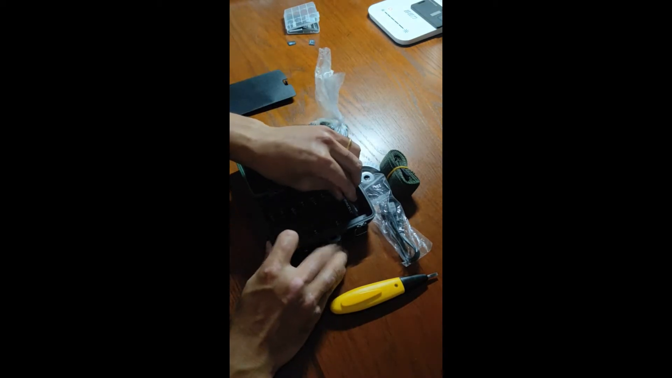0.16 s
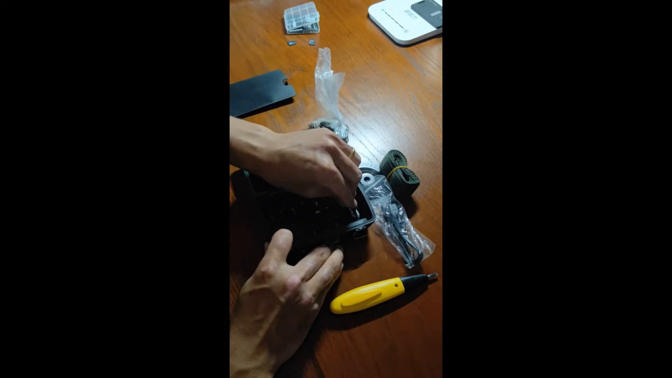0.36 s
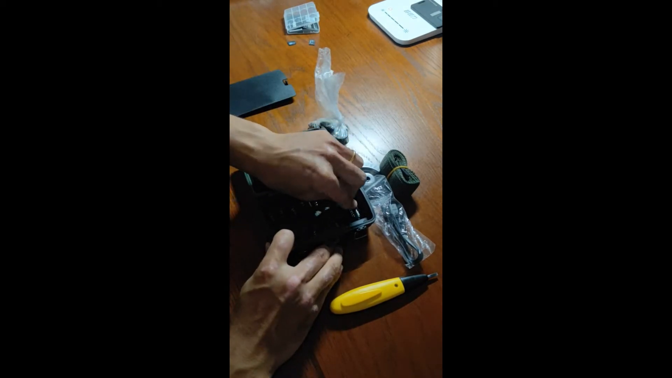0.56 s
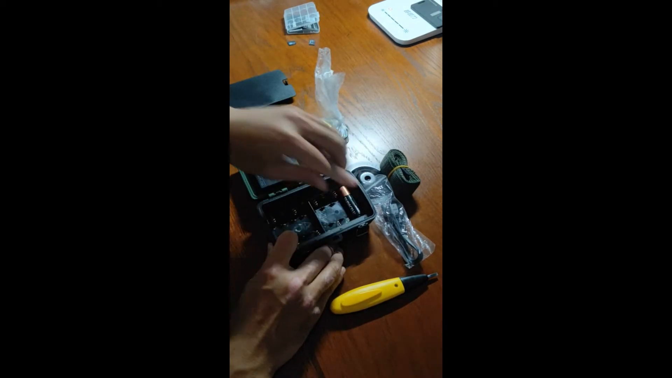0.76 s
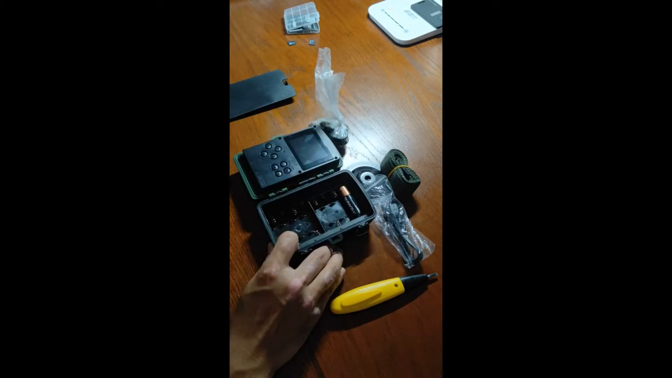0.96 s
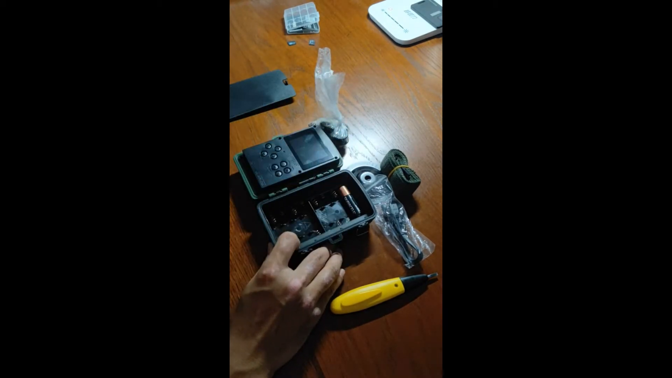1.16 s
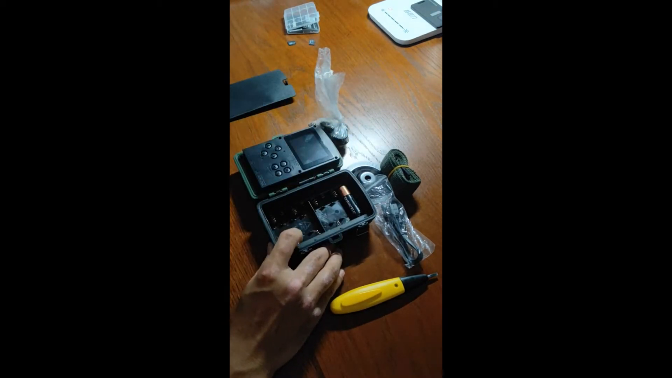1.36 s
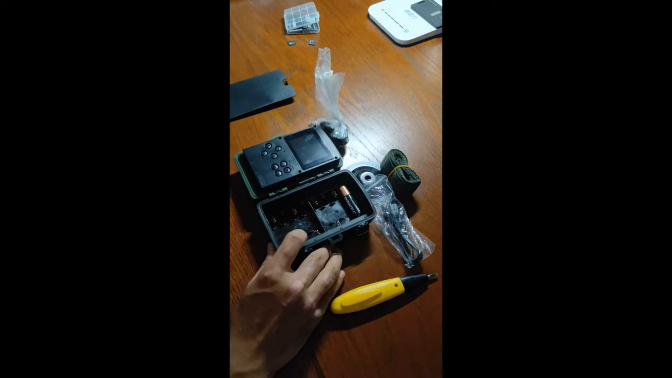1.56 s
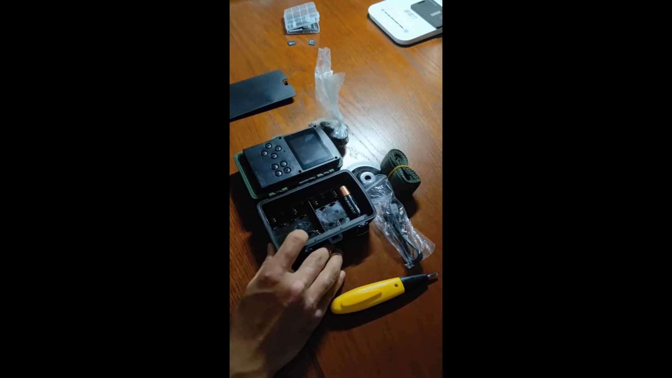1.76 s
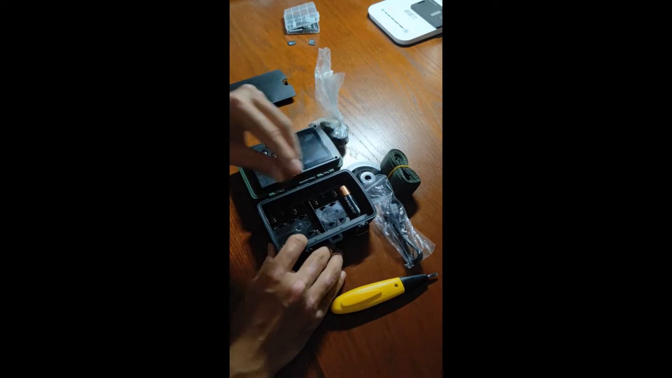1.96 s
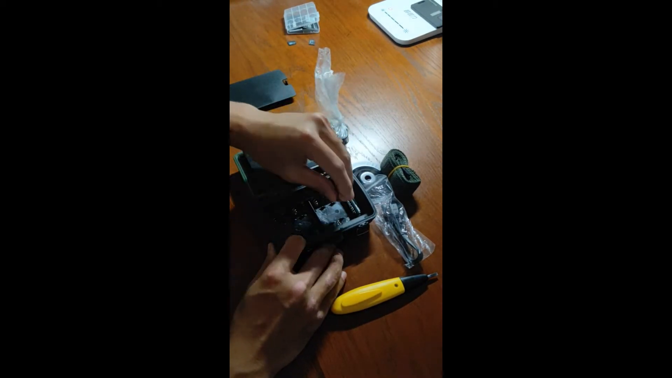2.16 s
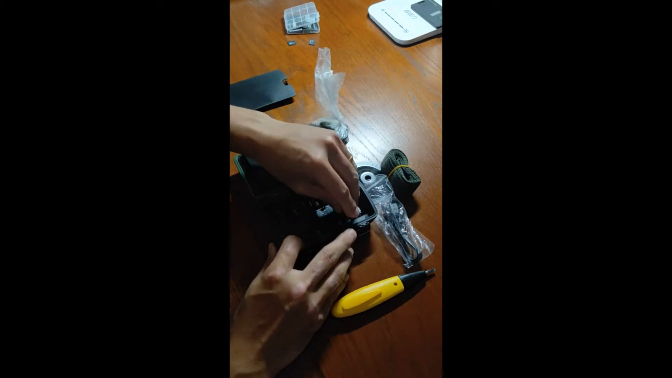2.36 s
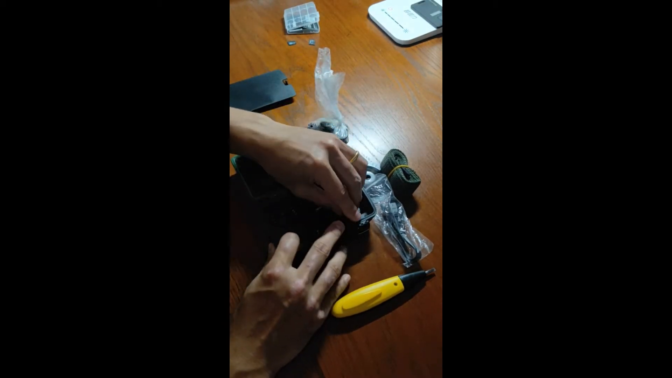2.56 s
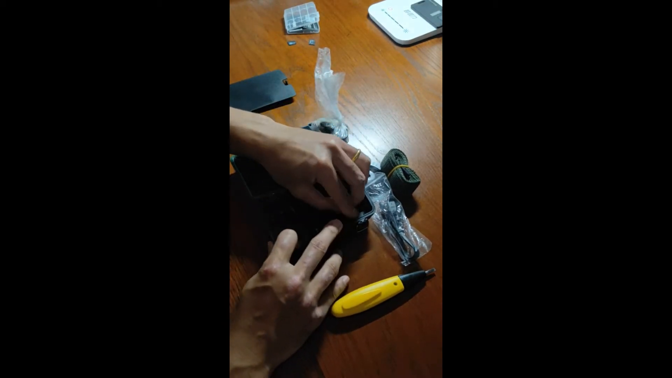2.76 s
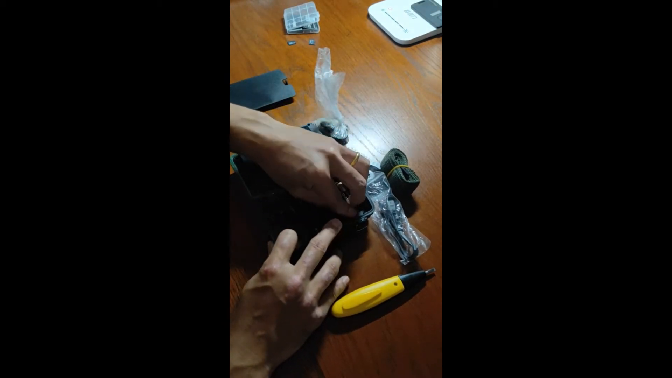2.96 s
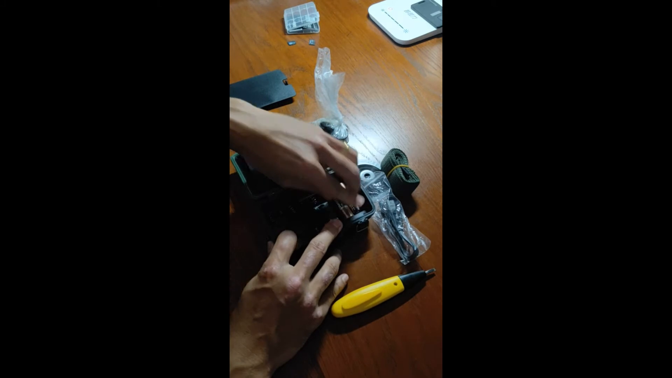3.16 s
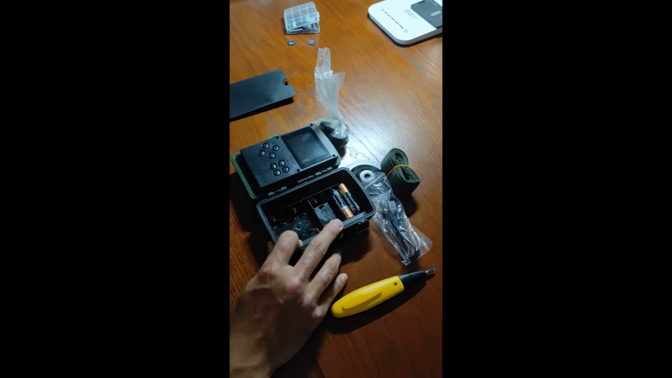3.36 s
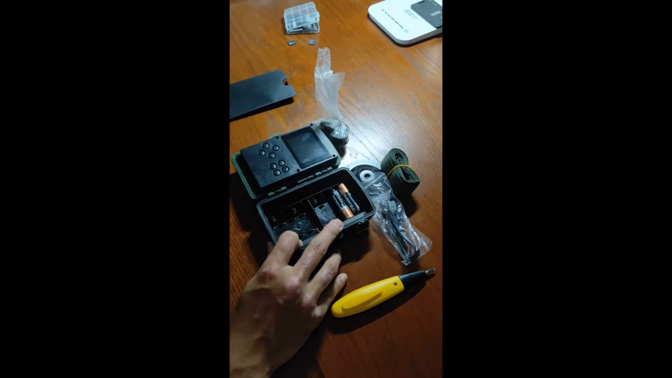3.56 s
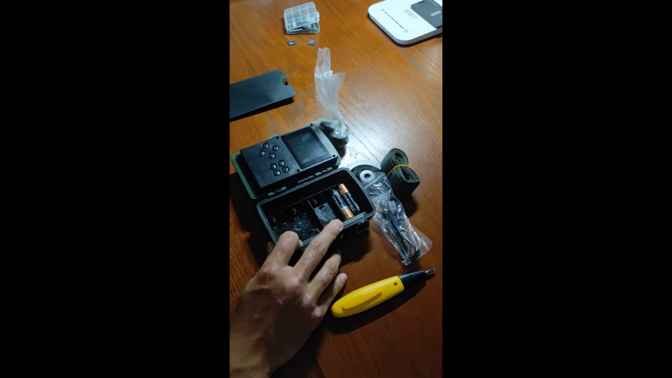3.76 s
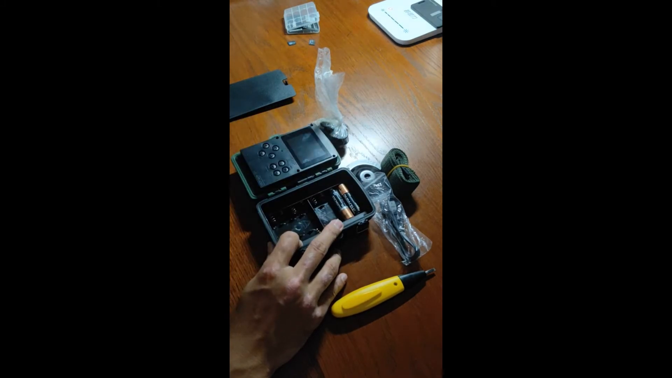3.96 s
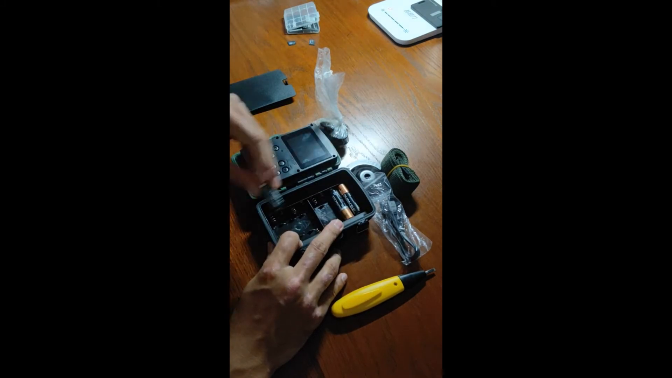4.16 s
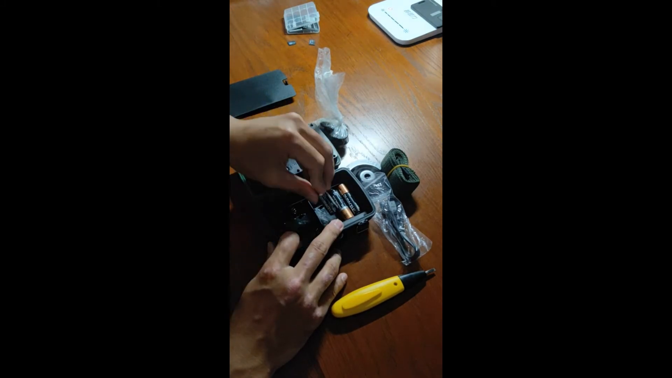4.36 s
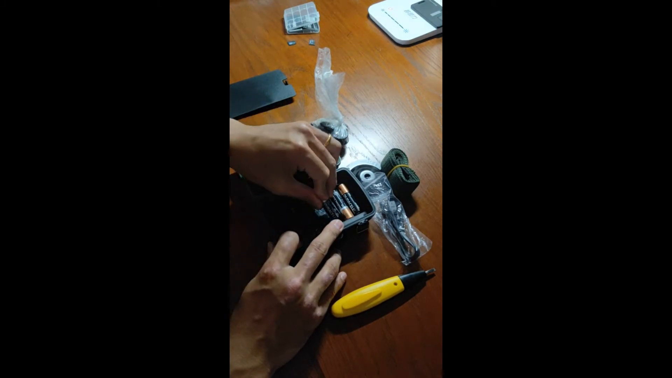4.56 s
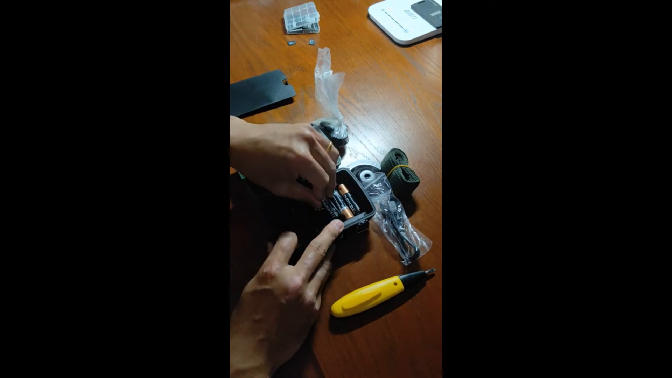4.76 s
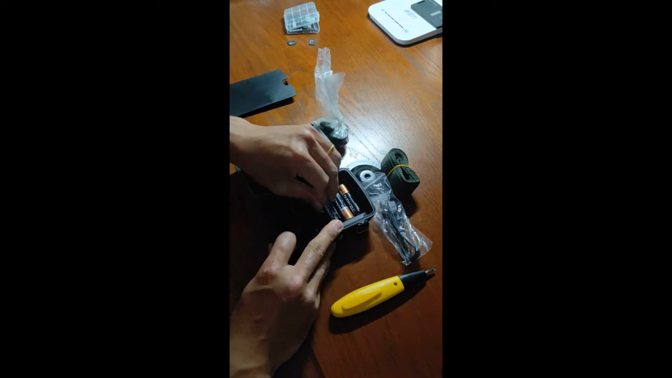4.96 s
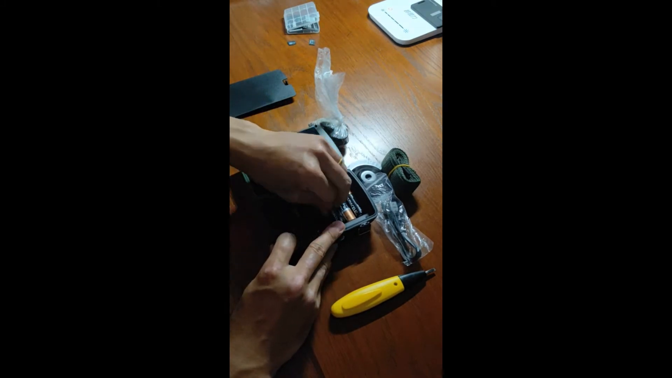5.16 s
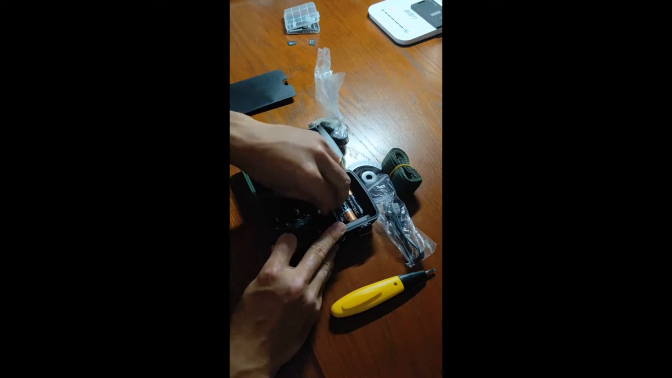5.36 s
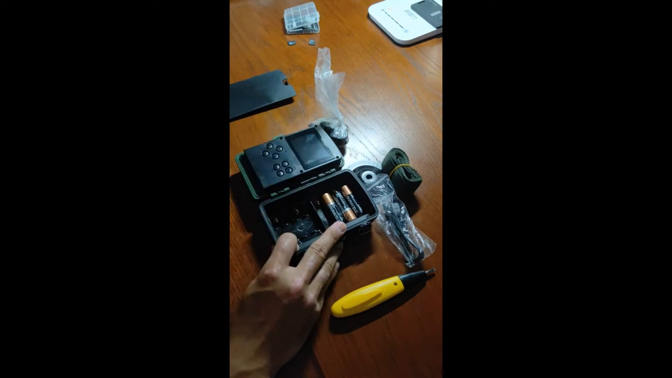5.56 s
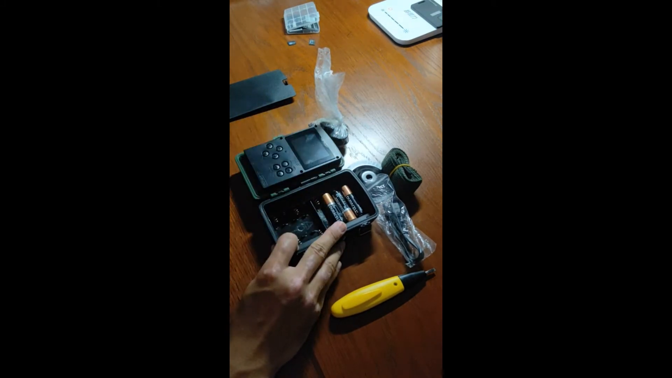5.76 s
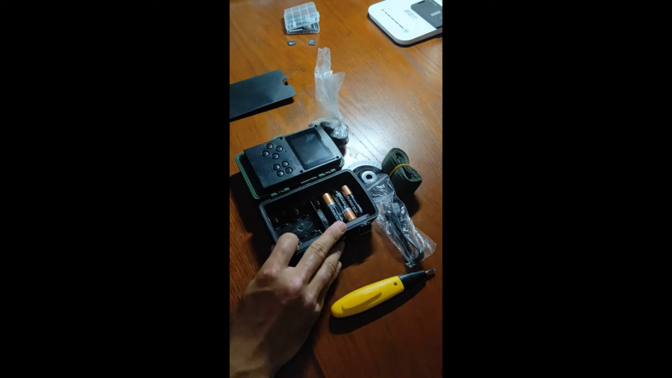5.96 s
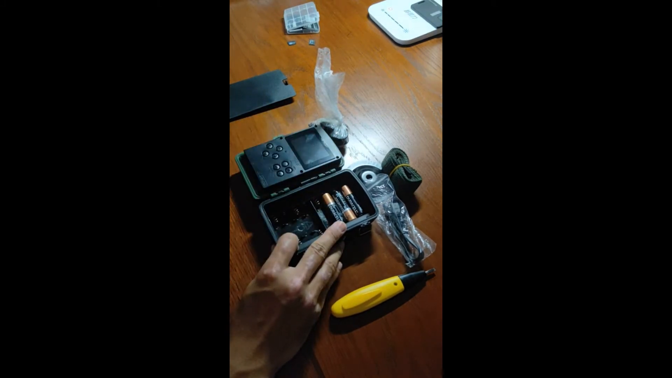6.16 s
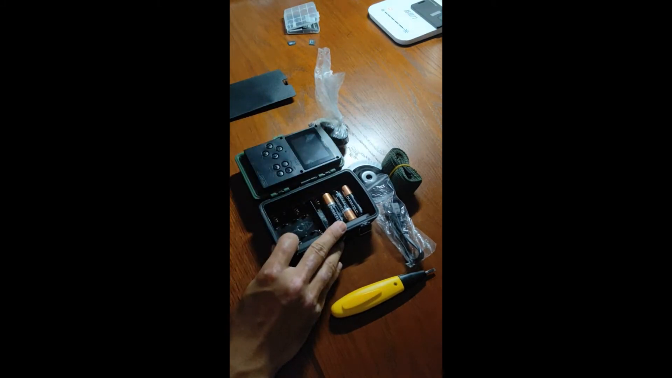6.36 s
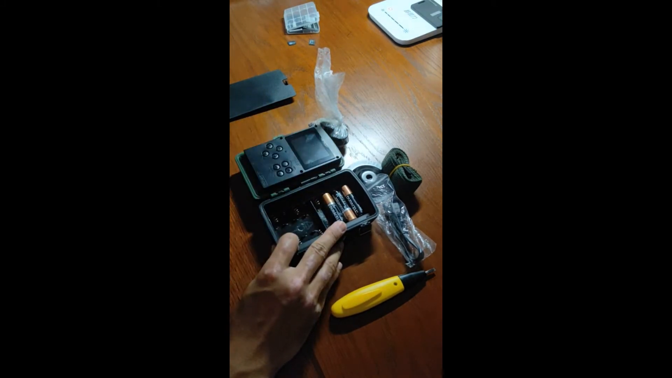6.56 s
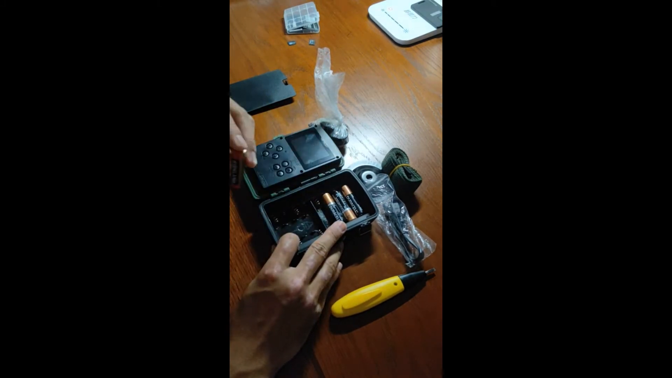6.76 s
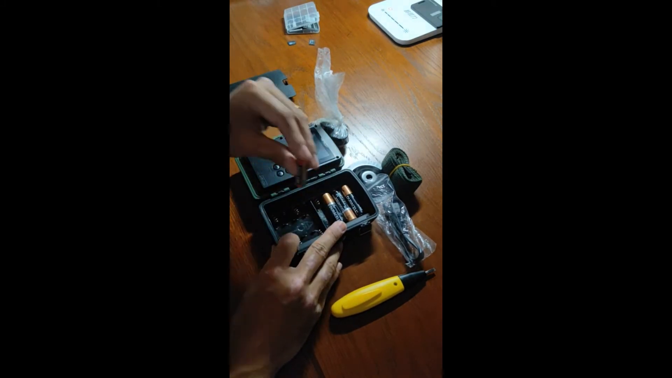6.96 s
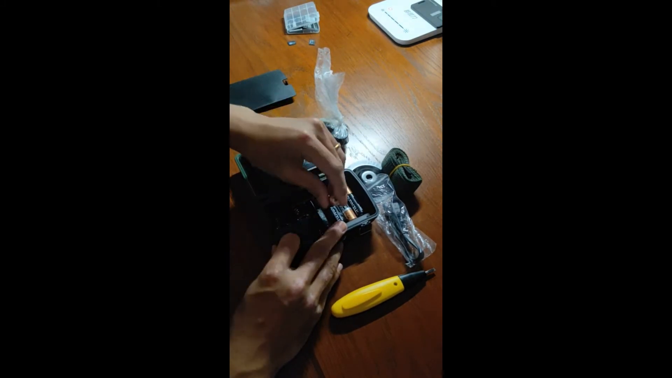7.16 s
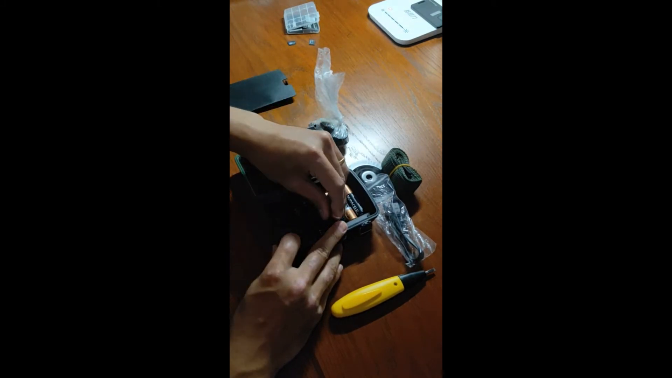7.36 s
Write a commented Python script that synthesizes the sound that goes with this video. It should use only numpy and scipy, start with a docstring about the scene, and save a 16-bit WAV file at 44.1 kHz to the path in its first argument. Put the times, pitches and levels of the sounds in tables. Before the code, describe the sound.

Sharp, irregular plastic clicks and knocks as batteries are pressed into a case, with light scrapes, rubbing fingers and soft room noise.

```python
"""Batteries click one by one into the plastic bay of a camera that lies open on a wooden table.
Each knock makes the table, the hollow case and its thin walls ring; hard presses jolt the table top.
Contact springs ping, batteries scrape along the plastic, and fingers bump and rub the case.
A small room echoes all of this, over soft air noise and a faint mains hum."""
import sys
import numpy as np
from scipy import signal
from scipy.io import wavfile

SR = 44100
rng = np.random.default_rng(int(sys.argv[2]) if len(sys.argv) > 2 else 0)


def unload_wav(signal):
    """Save mono or channel-first audio to the path in sys.argv[1] as 16-bit WAV at rate SR, clipped to [-1, 1]."""
    wavfile.write(
        sys.argv[1],
        SR,
        np.round(np.clip(np.atleast_2d(signal).T, -1, 1) * 32767).astype(np.int16),
    )


N = 326781

# Tone color of the room air: (frequency [Hz], relative level [dB])
AIR_SPECTRUM = [(20, -3), (35, 1.5), (65, -4), (100, -13.5), (170, -16.5), (300, -16), (450, -23),
                (650, -25.5), (900, -24.5), (1400, -33), (3000, -35.5), (8000, -37.5)]
# Tones of the hum: (frequency [Hz], average level [dB])
HUM_TONES = [(59.5, -78), (120, -70), (240, -85), (441, -81)]
# How alike left and right are for sound from all sides: (frequency [Hz], likeness [-1 to 1])
STEREO_LIKENESS = [(25, .55), (100, 1), (330, -0.008), (600, 1), (1000, -0.32), (1600, -0.28),
                   (3000, -0.14)]
# The room's echo: (frequency [Hz], relative level [dB], fade time [s])
# A fade time is how long a sound takes to drop by 60 dB.
ROOM_ECHO = [(100, 5, 0.3), (254, -4.5, 0.51), (447, -6, .5), (782, -1, .48), (1720, -1, 0.53),
             (3460, -1, 0.41), (5982, -3.5, 0.51), (8000, 2, 0.12)]
# Fingers rub the case: (start [s], length [s], relative level [dB])
FINGER_RUBS = [(0.106, 0.56, -65.5), (1.568, 0.086, -64), (2.19, 0.16, -61), (2.4, 0.43, -64),
               (3.605, 0.15, -56.5), (4.542, 0.41, -65.5), (4.997, .4, -69.5), (5.876, 0.16, -71),
               (7.298, 0.12, -63)]
# A battery slides: (middle time [s], half length [s], level [dB])
BATTERY_SLIDES = [(0.116, 0.012, -74), (0.177, 0.0087, -70), (0.63, 0.052, -80.5), (2.209, 0.03, -68),
                  (2.337, 0.012, -77), (2.726, 0.012, -59.5), (4.518, 0.016, -68), (4.635, 0.013, -61),
                  (4.932, 0.009, -67), (5.048, 0.048, -71.5)]
# Hard presses shake the table: (time [s], frequency [Hz], relative level [dB], fade time [s])
TABLE_JOLTS = [(.183, 74.6, -46.5, 0.14), (2.937, 71.6, -44, 0.096), (5.075, 80.3, -54, 0.14)]
# Contact springs let go: (time [s], frequency [Hz], relative level [dB], fade time [s])
SPRING_PINGS = [(2.727, 5800, -43.5, 0.019), (2.727, 6530, -42.5, 0.021), (2.9385, 4580, -29, 0.0066),
                (3.617, 4640, -56, .1), (3.617, 6700, -44, 0.03)]
# Natural tones of the case on the table: (frequency [Hz], relative level [dB], fade time [s])
CASE_TONES = [(127.6, 4, 0.19), (222.2, -2, 0.25), (235, -3.5, 0.13), (314.9, -3.5, 0.2),
              (350.7, -4, 0.082), (426.2, 1.5, 0.072), (505, -7.5, .06), (586, 1, 0.088), (715.8, 1, 0.034),
              (832.6, -1, 0.035), (957, -7.5, 0.046), (1238, -5, 0.029), (1395, -6, 0.025), (1522, -3, .04),
              (1740, -9, 0.024), (2000, -2, .04), (2427, -3.5, 0.089), (3490, 1, .025), (5000, -6.5, 0.015),
              (5300, -4.5, 0.015), (6040, 0, 0.028), (6700, -2, 0.0079), (7260, 8.5, .016)]
# Six pitch ranges of a knock, bass to treble: (low edge [Hz], high edge [Hz], gain [dB],
# noise level against the tones [dB], noise fade time [s], left-right likeness [-1 to 1])
PITCH_RANGES = [(83, 280, -1.5, -5.5, 0.15, 1), (280, 520, -2.5, -8.5, 0.19, 1),
                (520, 1050, -0.5, -6, .07, 0.23), (1140, 1900, -4, -3.5, 0.019, 0.4),
                (1770, 3400, -0.5, 9, 0.05, 0.086), (4280, 7600, 0, 5.5, 0.028, -0.26)]
# How each range answers a knock: (gain [dB], share of hardness [0 to 1], share of weight [0 to 1],
# most boost from a nearby favored pitch [dB])
KNOCK_RESPONSE = [(-2.5, 0, 1, 7), (1.5, 0.063, 0.55, 5.5), (-2.5, 0.091, 0, 7.5), (-9.5, .33, 0, 12),
                  (-9.5, 0.96, 0.047, 10), (-2.5, 1, 0, 4)]
# A fingertip bumps the case: (time [s], relative level [dB], weight [dB], favored pitch [Hz])
FINGER_BUMPS = [(0.149, -72, 17, 310), (.216, -54.5, 7, 304), (0.564, -73.5, 17.5, 384),
                (2.207, -62, 4, 434), (2.273, -54, -1.5, 305), (2.406, -67, 4, 310), (2.604, -58, 1, 316),
                (3.153, -53, 2.5, 801), (3.176, -58.5, -2, 314), (3.676, -61, 13, 445),
                (5.325, -60, -7, 425), (5.363, -65, 7, 420), (5.691, -53, 12, 321),
                (5.705, -64, 11.5, 326.3), (5.735, -54.5, -4.5, 748)]
# A battery hits the bay: (time [s], relative level [dB], hardness [dB], weight [dB], favored pitch [Hz])
BATTERY_CLICKS = [(0.099, -66.5, -12, 1.5, 298), (.12, -58, -9, 2.5, 294), (.179, -49.5, -9, 3.5, 352),
                  (0.1872, -32.5, -16.5, -9, 1015), (.249, -61, 1.5, 6.5, 336),
                  (0.4218, -39.5, -7, -8.5, 420), (.632, -66.5, -6, -7, 300), (2.326, -62.5, -10.5, 0, 307),
                  (2.468, -62, -14.5, -2, 322), (2.516, -64, -12.5, -9, 430), (2.577, -45, -7, -4, 322),
                  (2.582, -53.5, -0.5, -5, 418.7), (2.7257, -50.5, -8.5, 7, 435), (2.935, -51, 6, 11, 674),
                  (2.9378, -31, 5, -4, 1278), (2.9402, -28.5, -3.5, -11, 798), (3.609, -67, 6, 0, 492),
                  (3.617, -54.5, 3, -3, 543), (3.633, -54, -3, -16, 610), (3.655, -56, -8.5, -5.5, 587),
                  (3.8338, -49.5, -15.5, -7, 580), (4.472, -68, -6.5, 3, 323), (4.513, -58, -3, 4.5, 325),
                  (4.632, -55, -6, 5.5, 3500), (4.8153, -40.5, -9.5, -9, 1880), (4.859, -52, -22, 1, 427),
                  (4.933, -51.5, -13.5, -5, 383), (5.019, -63.5, -10, 1, 600),
                  (5.0532, -47, -7.5, -9.5, 1475), (5.074, -50.5, 7.5, -9, 1453),
                  (5.078, -45.5, -5, -3.5, 445), (6.174, -54.5, 1.5, -6.5, 598),
                  (6.197, -60.5, 0.5, 1.5, 593), (7.153, -45.5, -2, -5, 3580), (7.3042, -44, -11, -2, 1760)]


def from_db(db):
    """Turns decibels into a gain to multiply by."""
    return 10 ** (np.asarray(db) / 20)


def unit_level(x):
    """Scales a sound to an average (rms) level of 1."""
    return x / np.sqrt(np.mean(x ** 2) + 1e-20)


def unit_attack(x):
    """Scales a sound so its first 10 ms have an average (rms) level of 1."""
    return x / np.sqrt(np.mean(x[:, :SR // 100] ** 2) + 1e-20)


def at_hz(table, hz, column=1):
    """Reads a table at any frequency, blending between its rows."""
    table = np.array(table)
    return np.interp(np.log(hz), np.log(table[:, 0]), table[:, column])


def band(x, low, high, order=2):
    """Keeps the sound between two frequencies."""
    return signal.sosfilt(signal.butter(order, [low, high], "band", fs=SR, output="sos"), x)


def stereo_noise(size, alike):
    """White noise whose two sides are the same (alike=1), unrelated (0) or opposite (-1)."""
    mid, side = rng.standard_normal((2, size))
    alike = np.clip(alike, -1, 1)
    return (np.sqrt(1 + alike) * mid + np.sqrt(1 - alike) * side * [[1], [-1]]) / np.sqrt(2)


def surrounding_bands(size):
    """Noise from all sides, half an octave at a time, each band with its center frequency."""
    edges = 20 * 2 ** (np.arange(19) / 2)
    for low, high in zip(edges, edges[1:]):
        hz = np.sqrt(low * high)
        yield hz, band(stereo_noise(size, at_hz(STEREO_LIKENESS, hz)), low, high)


def drift(turns_per_s):
    """A value that wanders at random around zero."""
    points = rng.standard_normal(N // 100)
    return np.interp(np.arange(N) / SR * turns_per_s, np.arange(len(points)), points)


def add(out, time, sound):
    """Mixes a stereo sound in at a time in seconds."""
    start = int(round(time * SR))
    out[:, start:start + sound.shape[1]] += sound[:, :N - start]


def noisy_rings(events, half_width_hz, alike):
    """Narrow bands of fading noise act as many close tones; a shorter ring has a wider band."""
    out, t = np.zeros((2, N)), np.arange(SR // 4) / SR
    for time, hz, db, fade_s in events:
        reach_hz = half_width_hz + 4.7 / fade_s
        burst = stereo_noise(len(t), alike) * from_db(-60 * t / fade_s)
        ring = band(burst, max(hz - reach_hz, 10), hz + reach_hz)
        add(out, time, from_db(db) * 2 * ring / np.abs(ring).max())
    return out


def room_air(level_db=-66.5):
    """The air in the room makes a soft, low, steady rush."""
    air = sum(noise * from_db(at_hz(AIR_SPECTRUM, hz)) for hz, noise in surrounding_bands(N))
    return from_db(level_db) * unit_level(air)


def mains_hum(waver_db=2.5, waver_rad=0.95):
    """Mains power hums in a few low tones that waver slightly."""
    hum, t = np.zeros(N), np.arange(N) / SR
    for hz, db in HUM_TONES:
        peak = np.sqrt(2) * from_db(db + waver_db * drift(4))
        hum += peak * np.sin(2 * np.pi * hz * t + waver_rad * drift(6.8))
    return hum


def room_echo(sound, first_echo_s=0.0032, early_db=7.0, early_s=0.027):
    """Near surfaces answer first, then comes a smooth tail that dies soonest in the high treble."""
    t = np.arange(int(0.7 * SR)) / SR
    tail = sum(noise * from_db(at_hz(ROOM_ECHO, hz) - 60 * t / at_hz(ROOM_ECHO, hz, column=2))
               for hz, noise in surrounding_bands(len(t)))
    build_up = np.clip(t / first_echo_s - 1, 0, 1) * from_db(early_db * np.exp(-t / early_s))
    echo = tail * build_up / np.sqrt(SR / 20)
    return signal.fftconvolve(sound, echo, axes=1)[:, :N]


def rub_pressure(rise_s=0.05, fall_s=0.037, resting_db=-83):
    """Each rub swells, holds and lets go; in between, the hand rests on the case."""
    pressure, t = np.full(N, from_db(resting_db)), np.arange(N) / SR
    for start, length, db in FINGER_RUBS:
        end = start + length
        pressure += from_db(db) * np.interp(t, [start - rise_s, start, end, end + fall_s], [0, 1, 1, 0])
    return pressure


def finger_rubs(slips_per_s=80, uneven_db=4.5, gain_db=-2.5):
    """Skin sticks and slips, and each tiny slip rings the low tones of the case."""
    slips = (rng.random(N) < slips_per_s / SR) * rng.standard_normal(N)
    slips *= from_db(uneven_db * drift(30))
    body = sum(case_ring(pitch_range) for pitch_range in PITCH_RANGES[:3])
    ringing = signal.fftconvolve(slips[None], body)[:, :N]
    return from_db(gain_db) * rub_pressure() * unit_level(band(ringing, 240, 780))


def battery_slides(catches_per_s=2500):
    """A sliding battery catches on the fine grain of the plastic."""
    t = np.arange(N) / SR
    swells = sum(from_db(db) * np.exp(-((t - middle) / half_length) ** 2)
                 for middle, half_length, db in BATTERY_SLIDES)
    catches = (rng.random(N) < catches_per_s / SR) * rng.standard_normal((2, N))
    return swells * unit_level(band(catches, 1100, 8000, order=1))


def table_jolts():
    """A hard press shakes the table top, which gives a deep thud."""
    return noisy_rings(TABLE_JOLTS, half_width_hz=20, alike=0.93)


def spring_pings():
    """A contact spring lets go and rings, high and short."""
    return noisy_rings(SPRING_PINGS, half_width_hz=130, alike=0)


def case_ring(pitch_range, favored_hz=(), favor_db=11.0, favor_octaves=0.24, spread_db=2.0):
    """The case rings in one pitch range: a few clear tones, plus noise for the many crowded ones."""
    low, high, gain_db, noise_db, noise_fade_s, alike = pitch_range
    t = np.arange(SR // 6) / SR
    tones = np.zeros((2, len(t)))
    chance = rng.standard_normal((len(CASE_TONES), 2))  # no two knocks are quite the same
    for k, ((hz, db, fade_s), (strength, lead)) in enumerate(zip(CASE_TONES, chance)):
        if low <= hz < high:
            # Tones that move most at the struck spot take most of the knock.
            favor = np.exp(-(np.log2(np.array(favored_hz) / hz) / favor_octaves) ** 2).sum()
            envelope = from_db(db + spread_db * strength + favor_db * favor - 60 * t / fade_s)
            # Short waves reach left and right out of step.
            phase = np.sign(lead) * np.arccos(alike) / 2 * np.array([[1], [-1]])
            tones += (-1) ** k * envelope * np.sin(2 * np.pi * hz * t + phase)
    tones = band(tones, low / 2, min(2.2 * high, SR / 3), order=1)
    burst = stereo_noise(len(t), alike) * from_db(-60 * t / noise_fade_s)
    noise = band(burst, low, high, order=3)
    return from_db(gain_db) * unit_attack(unit_attack(tones) + from_db(noise_db) * unit_attack(noise))


def knock(hardness_db, weight_db, favored_hz, reach_octaves=0.7):
    """A hard knock rings the thin walls, a heavy one the table; the struck spot favors one pitch."""
    sound = 0
    for pitch_range, (db, hard_share, weight_share, boost_db) in zip(PITCH_RANGES, KNOCK_RESPONSE):
        center_hz = np.sqrt(pitch_range[0] * pitch_range[1])
        nearness = np.exp(-(np.log2(favored_hz / center_hz) / reach_octaves) ** 2)
        gain = from_db(db + hard_share * hardness_db + weight_share * weight_db + boost_db * nearness)
        sound += gain * case_ring(pitch_range, (favored_hz,))
    return sound


def finger_bumps(hardness_db=-23.5):
    """Soft fingertips knock the case with a dull sound."""
    out = np.zeros((2, N))
    for time, db, weight_db, favored_hz in FINGER_BUMPS:
        add(out, time, from_db(db) * knock(hardness_db, weight_db, favored_hz))
    return out


def battery_clicks():
    """Hard batteries knock the plastic bay with a sharp click."""
    out = np.zeros((2, N))
    for time, db, hardness_db, weight_db, favored_hz in BATTERY_CLICKS:
        add(out, time, from_db(db) * knock(hardness_db, weight_db, favored_hz))
    return out


def scene(echo_db=-4.5):
    """Mixes the handling of the camera, its echo and the background."""
    handling = battery_clicks() + finger_bumps() + spring_pings() + table_jolts()
    handling += battery_slides() + finger_rubs()
    return handling + from_db(echo_db) * room_echo(handling) + room_air() + mains_hum()


def record(dry, treble_edge_hz=7950, ceiling=0.33, cutoff_hz=9044):
    """Cuts the high treble steeply, rounds the loudest clicks a little, then trims the treble again."""
    narrow = signal.sosfilt(signal.ellip(8, 0.3, 50, treble_edge_hz, fs=SR, output="sos"), dry)
    rounded = ceiling * np.tanh(narrow / ceiling)
    return signal.sosfilt(signal.butter(10, cutoff_hz, fs=SR, output="sos"), rounded)


dry = scene()
out = record(dry)
unload_wav(out)
```